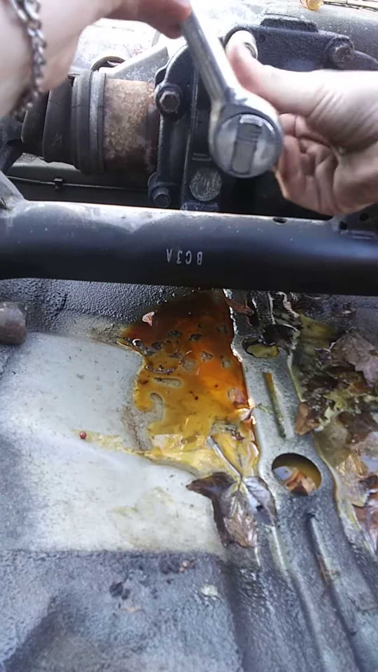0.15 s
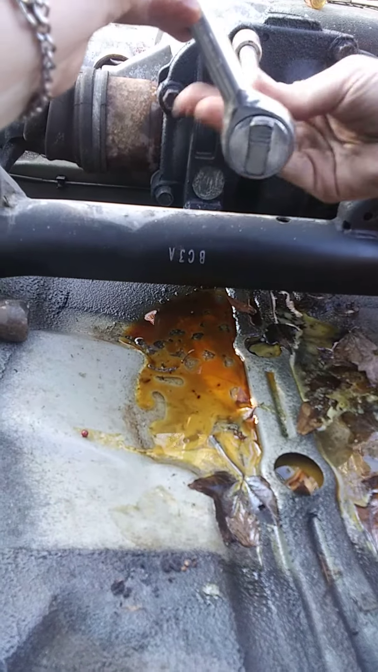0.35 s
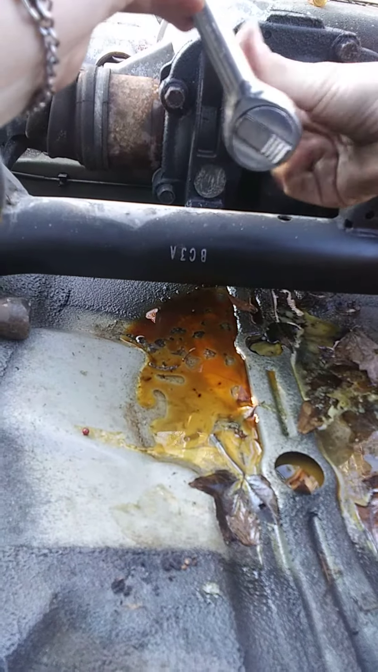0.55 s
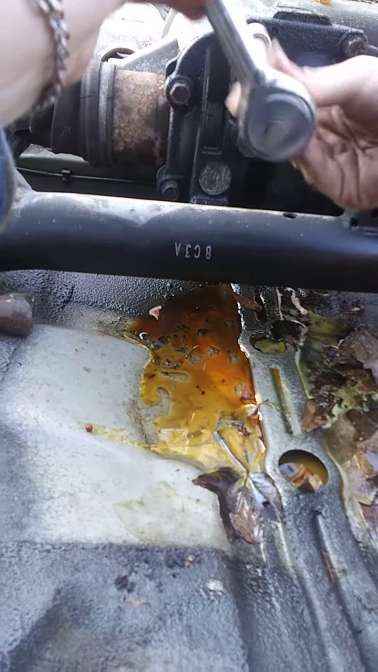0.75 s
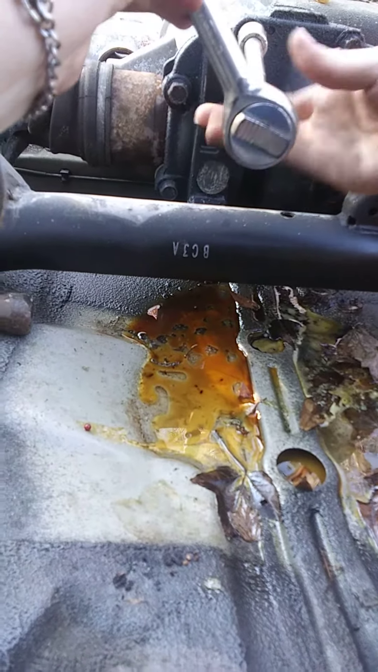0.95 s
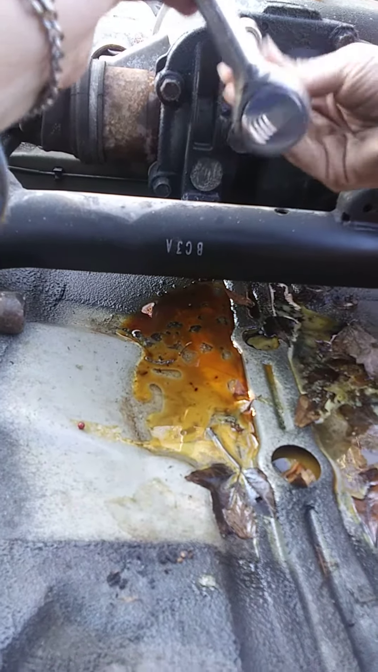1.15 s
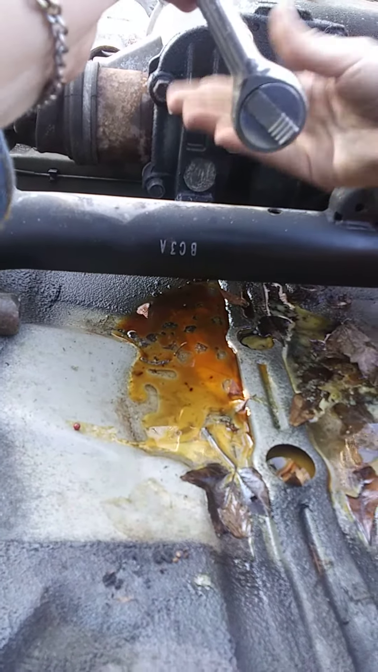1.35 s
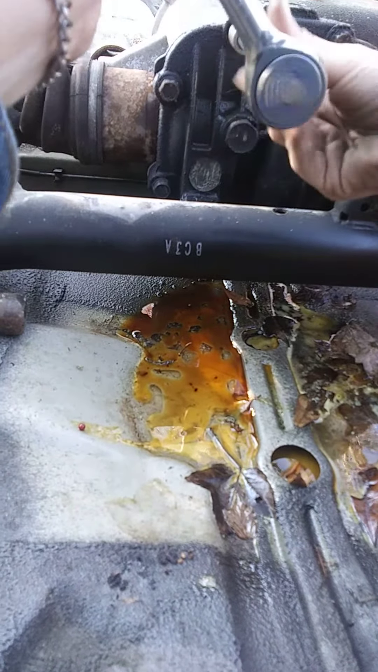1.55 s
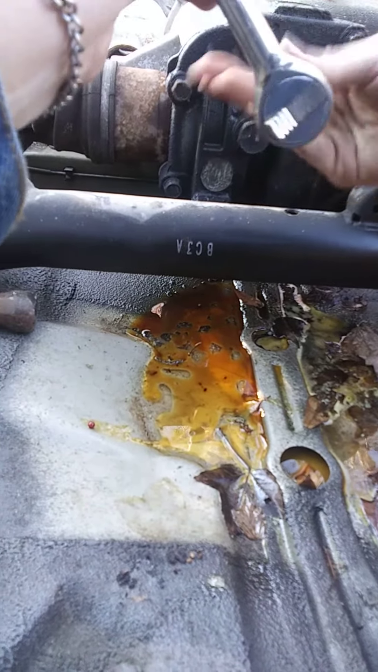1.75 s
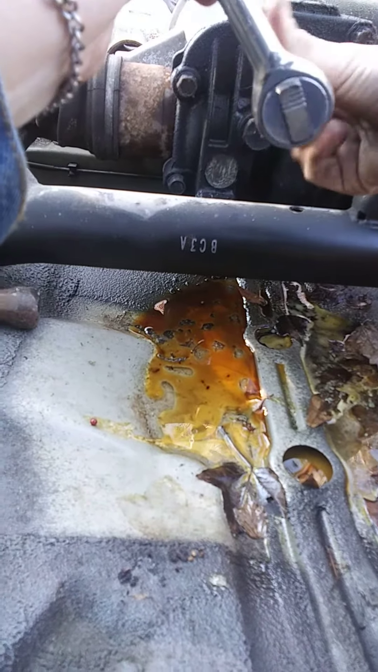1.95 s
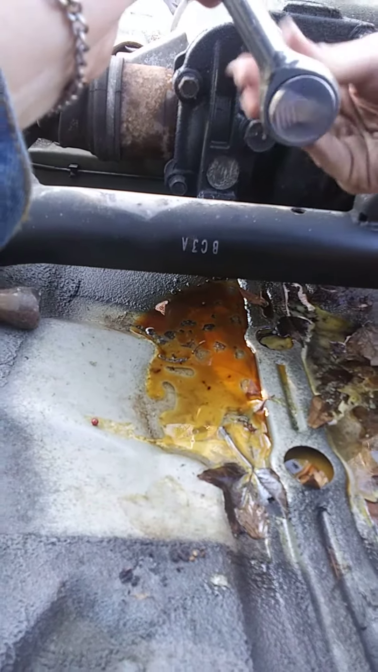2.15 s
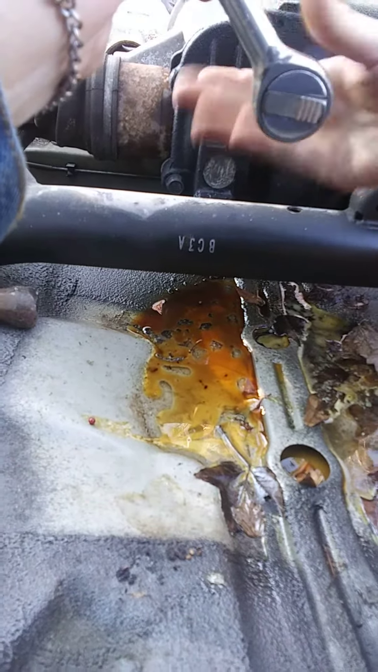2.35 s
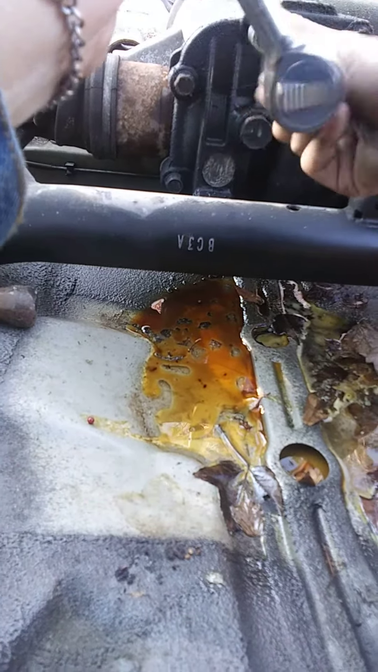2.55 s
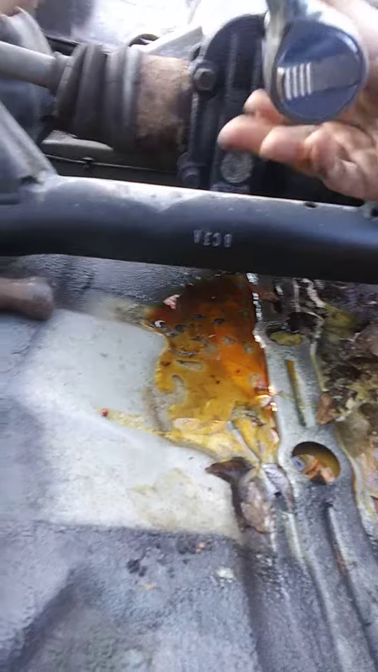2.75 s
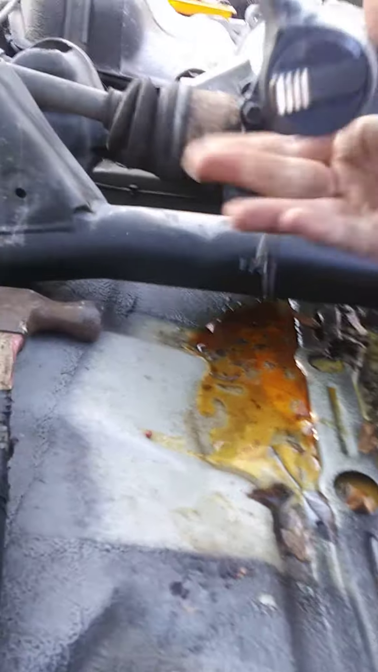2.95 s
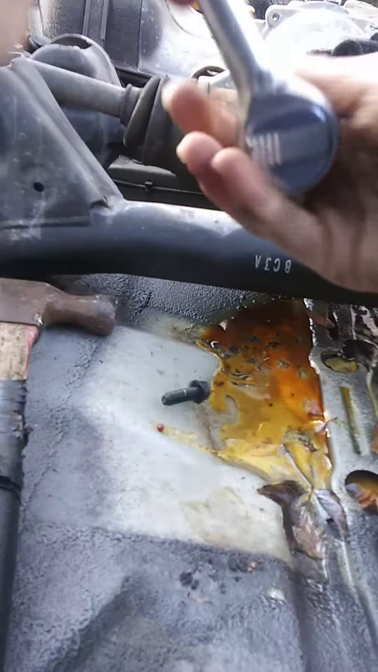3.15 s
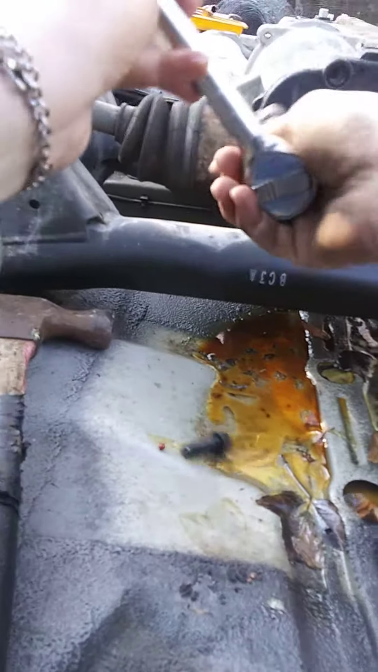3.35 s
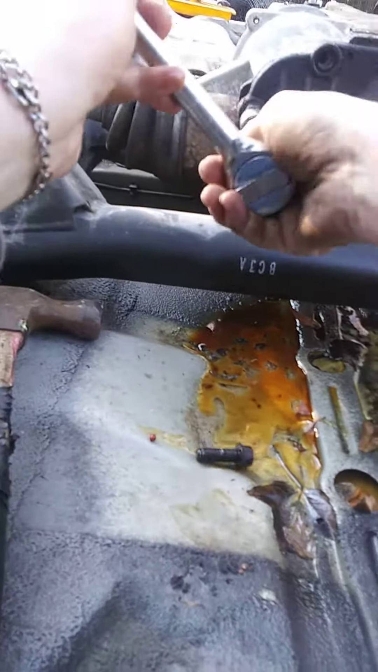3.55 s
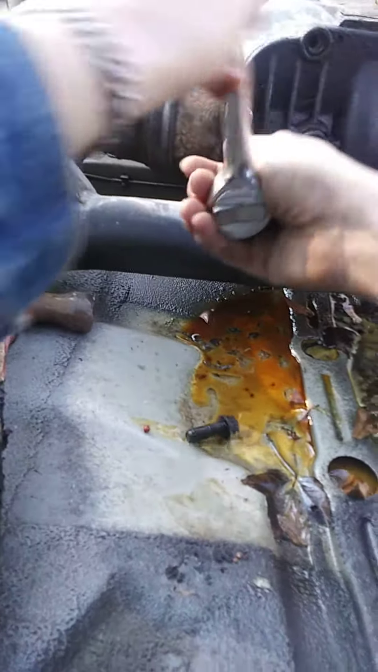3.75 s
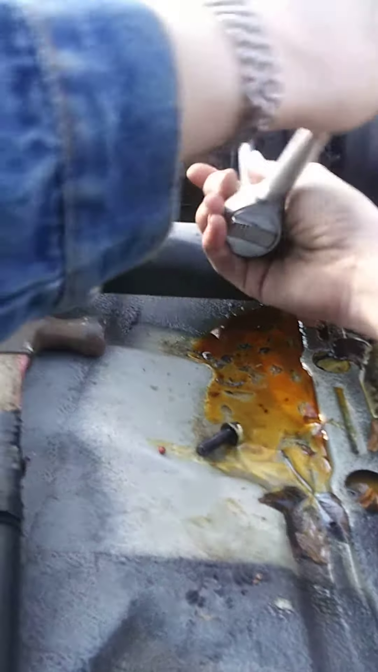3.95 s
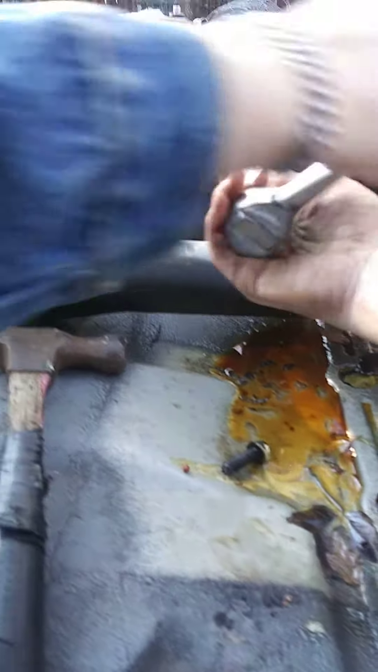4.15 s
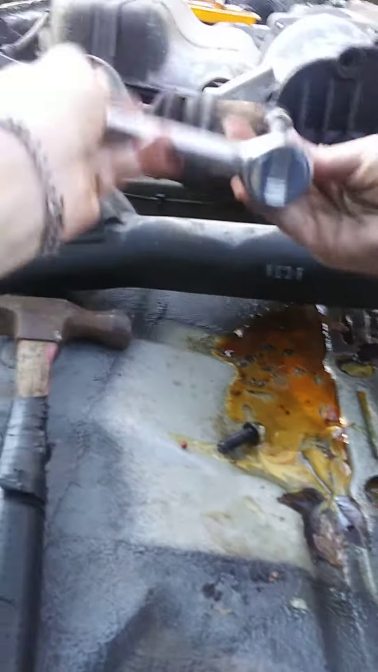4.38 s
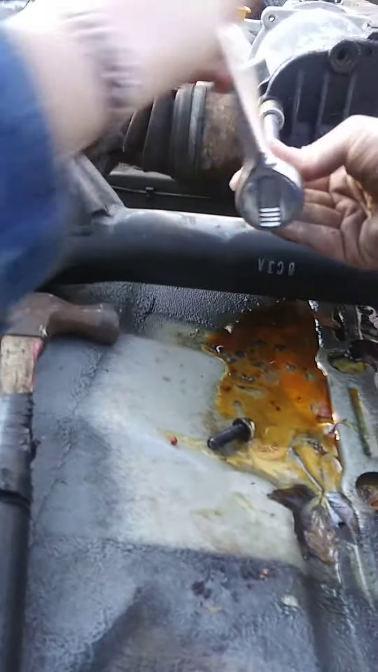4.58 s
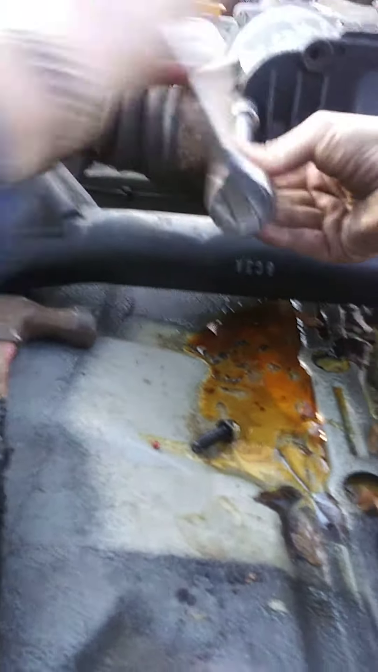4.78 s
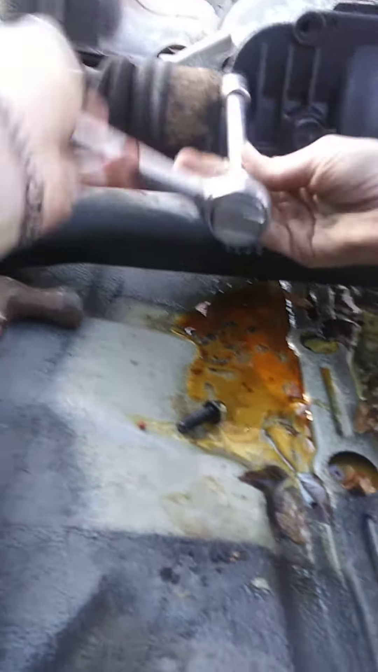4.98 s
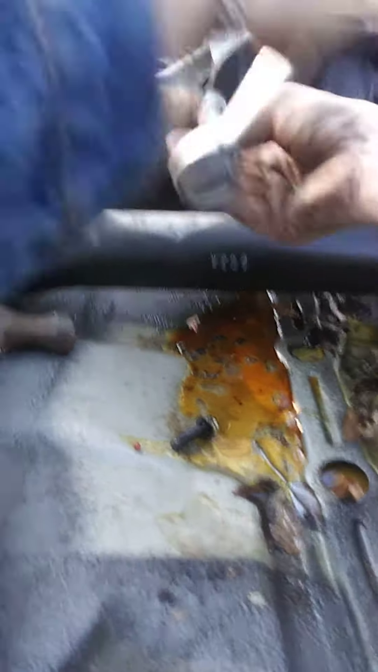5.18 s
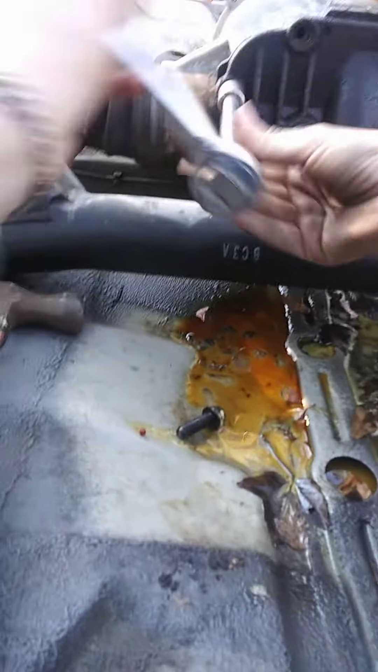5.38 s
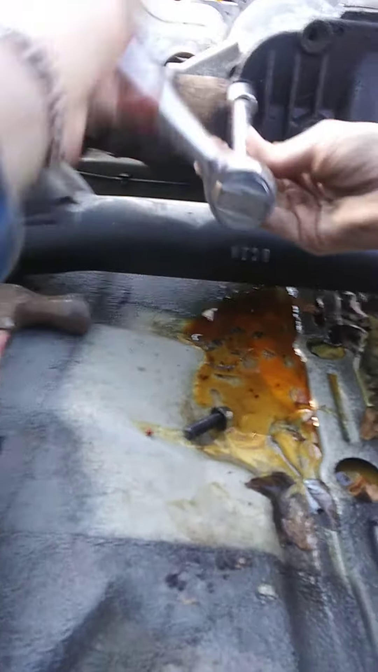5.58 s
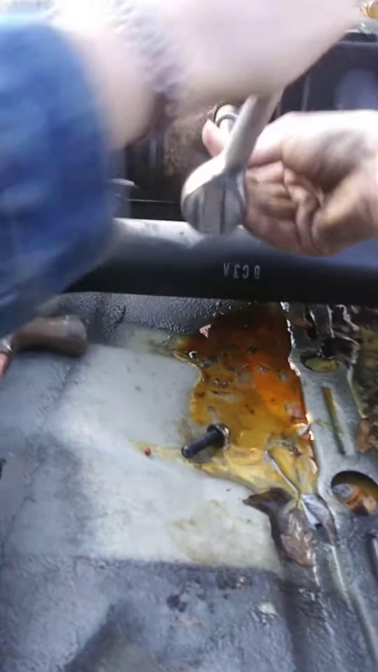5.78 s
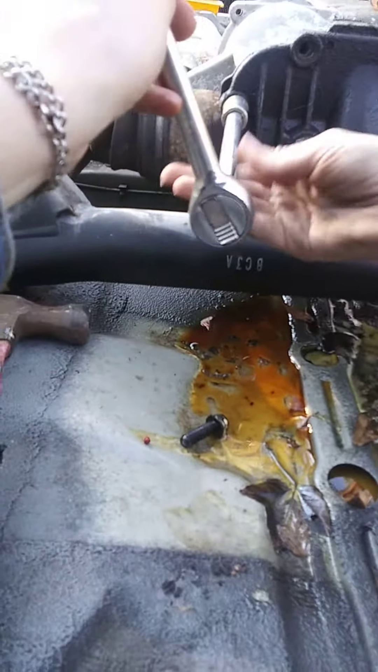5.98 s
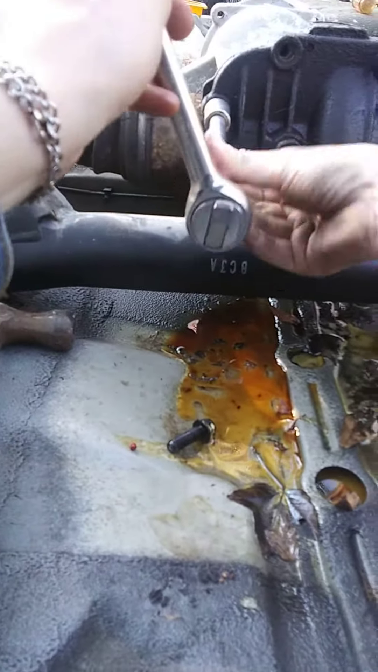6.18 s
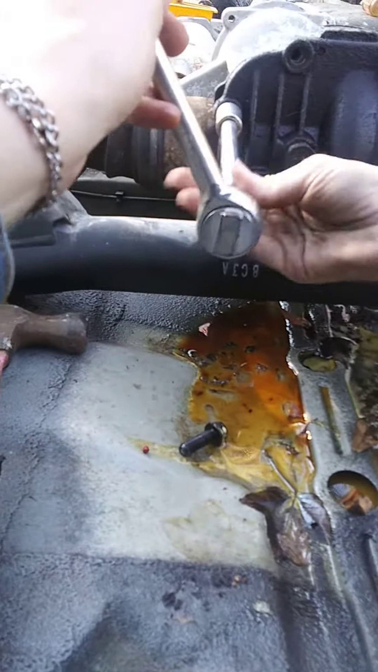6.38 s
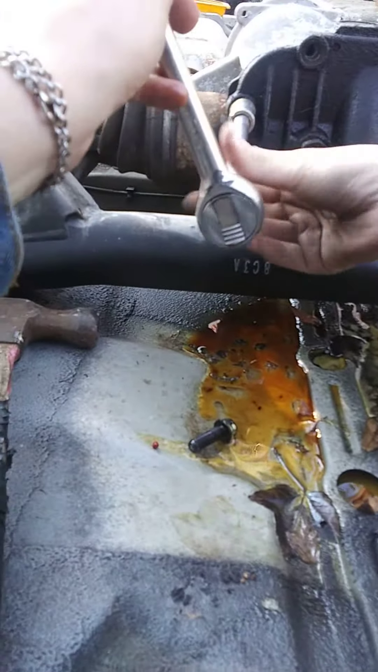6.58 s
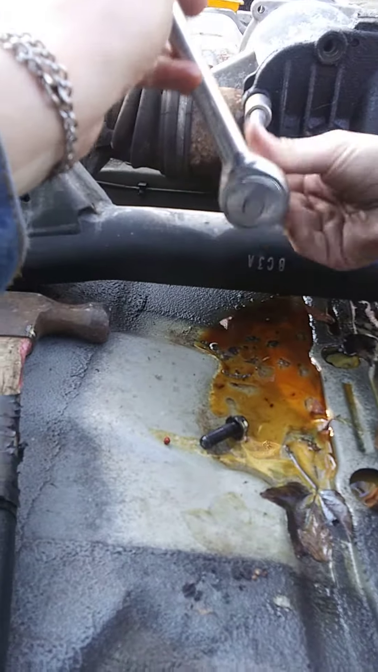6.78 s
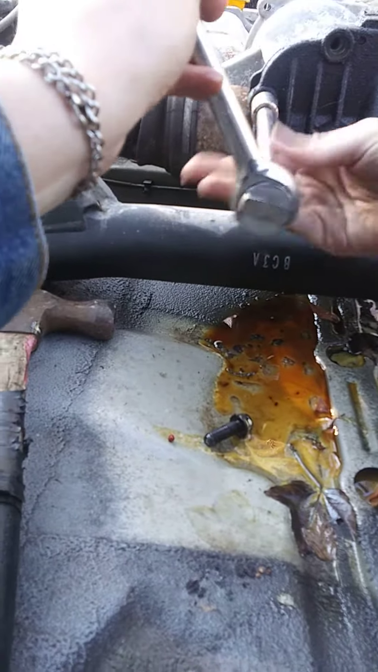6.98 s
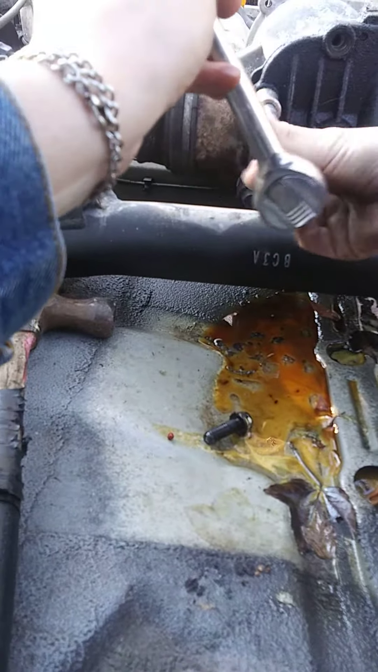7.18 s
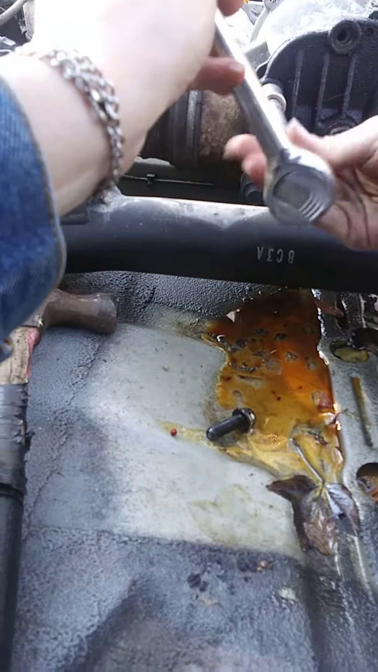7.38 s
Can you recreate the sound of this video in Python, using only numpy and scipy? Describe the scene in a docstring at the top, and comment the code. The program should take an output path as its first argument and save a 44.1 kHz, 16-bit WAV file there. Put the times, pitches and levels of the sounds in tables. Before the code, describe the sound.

Close to the microphone, a hand ratchet swings to and fro, each back stroke a quick, bright zip of metal clicks about three times a second. A freed bolt then clangs loudly on steel, bounces hollowly on plastic and rolls to rest. A sleeve brushes past with soft taps, and the ratcheting returns haltingly, in single teeth and short bursts. Quiet air and a faint hum lie behind, with a dry, short underbody reflection.

```python
"""Under a car, close to the microphone, a hand ratchet is swung to and fro; on each back stroke its pawl
snaps over the gear teeth and rings the steel head. Near 3 s a freed bolt clangs on the frame, bounces on a
plastic drain pan and rolls to rest. Cloth noise marks a sleeve brushing past, strongest at about 4 s, then
the ratchet goes on in slow single teeth and short strokes, among light taps and clinks. Behind it lies
still air with a faint hum that steps up near 6.5 s. A fast limiter holds down the blows."""
import sys
import numpy as np
from scipy import signal
from scipy.fft import rfft, irfft, next_fast_len
from scipy.io import wavfile
from scipy.ndimage import uniform_filter1d, minimum_filter1d, map_coordinates

SR = 44100
rng = np.random.default_rng(int(sys.argv[2]) if len(sys.argv) > 2 else 0)


def wrap_up_sound(samples):
    """Save the sound to the file named by the first command line argument, as 16-bit audio."""
    columns = np.atleast_2d(samples).T
    # keep every value between -1 and 1, then stretch to whole-number steps
    tamed = np.clip(columns, -1, 1)
    steps = np.round(tamed * 32767).astype(np.int16)
    wavfile.write(sys.argv[1], SR, steps)


N = 327663  # length of the scene [samples]


def amp(db):
    """Decibels to gain."""
    return 10 ** (np.asarray(db) / 20)


def unit(x):
    """Scale to rms 1."""
    return x / np.sqrt(np.mean(x ** 2) + 1e-20)


def noise(spectrum, size):
    """Noise of rms 1, coloured by (frequency [Hz], relative level [dB]) points."""
    hz, db = np.transpose(spectrum)
    m = next_fast_len(size)
    bins_hz = np.fft.rfftfreq(m, 1 / SR)
    gain = amp(np.interp(np.log(bins_hz + 1), np.log(hz), db))
    white = rng.standard_normal(m)
    return unit(irfft(rfft(white) * gain, m)[:size])


def wobble(rate):
    """A smooth random curve with `rate` knots a second."""
    knots = rng.standard_normal(int(N * rate / SR) + 4)
    return map_coordinates(knots, [np.arange(N) * rate / SR])


def fade(t, t60):
    """Exponential decay by 60 dB in t60 seconds."""
    return np.exp(-np.log(1000) * t / t60)


def ring(modes, t, scatter_db):
    """Damped modes of a struck body, with new strengths and phases each time."""
    hz, db, t60 = np.transpose(modes)[:, :, None]
    size = amp(db + scatter_db * rng.standard_normal(hz.shape))
    rise = 1 - np.exp(-2 * hz * t)  # each mode builds up mostly within its first cycle
    wave = np.sin(2 * np.pi * (hz * t + rng.random(hz.shape)))
    return np.sum(size * rise * fade(t, t60) * wave, axis=0)


def add(track, s, sound):
    """Mix a sound into the track at time s."""
    part = track[max(round(s * SR), 0):][:len(sound)]
    part += sound[:len(part)]


def swing(u, fastest):
    """Share of its end loss that a stroke has at share u of its length: 1 at both ends, 0 where fastest."""
    side = np.interp(u, [0, np.clip(fastest, .05, .95), 1], [-1, 0, 1])
    return np.abs(side) ** 1.4  # power 1 is a pointed swell, 2 a rounded one


# ring of the ratchet head: (frequency [Hz], relative level [dB], t60 [s])
HEAD_MODES = [(1300, -29, .025), (2750, -9, .018), (3745, -7, .038), (4050, -15, .028), (6970, -12, .05),
              (7350, -15, .025), (8120, -6, .025), (10480, -14, .024), (11060, -26, .025),
              (13000, -24, .035), (14170, -15, .02), (15450, -17, .022)]
# snap of the pawl: (frequency [Hz], relative density [dB per Hz])
SNAP_SPECTRUM = [(40, -30), (200, -7), (900, -23.5), (1900, -12.5), (2800, -3.5), (3900, -5), (4450, -10.5),
                 (5400, -9.5), (6200, 2), (7700, -2.5), (9000, -11.5), (10700, -17.5), (12000, -28.5),
                 (15700, -18)]


def colour(low_db, high_db):
    """A weight in dB for each mode of the head, from weights for its low and high modes."""
    hz = np.transpose(HEAD_MODES)[0]
    return low_db * (hz < 5000) + high_db * (hz > 9000)


def click(t, colour_db, ring_db, snap_t60):
    """The pawl falls on a tooth: a snap, and the ring of the head with its modes weighted by colour_db."""
    modes = [(hz, db + extra, t60) for (hz, db, t60), extra in zip(HEAD_MODES, colour_db)]
    since = t - rng.uniform(0.0012, 0.0055)  # the sprung pawl rebounds once
    rebound = amp(-9.5) * (since > 0) * fade(np.abs(since), snap_t60)
    snap = noise(SNAP_SPECTRUM, len(t)) * (fade(t, snap_t60) + rebound)
    onset = 1 - np.exp(-t / 0.00079)
    return (snap + amp(ring_db) * ring(modes, t, scatter_db=4.5)) * onset


# back strokes; where the wrist hesitates, a stroke comes in two pushes:
# (start [s], length [s], fastest point [share of length], relative vigour there [dB],
#  vigour lost at the ends [dB], weight of the low ring [dB], extra for the lowest modes [dB])
BACK_STROKES = [ (0.105, .104, .62, -28.5, 15, -6, 6.5), (.424, .144, .58, -27.5, 16, -4, 4.5),
                (0.756, .117, 0.44, -34.5, 12, -0.5, 9), (1.19, .078, .5, -28, 8, -4.5, 5),
                (1.525, 0.074, .75, -32.5, 6, -2, 5.5), (1.601, 0.039, .6, -30, 7.5, -6, 11),
                (1.84, .147, .38, -29, 12, 1.5, -3), (2.172, .13, .58, -26, 19, 1, -2.5),
                (2.503, .108, .6, -31.5, 8, 4.5, 2), (5.11, .135, .15, -39, 8.5, -2.5, 1),
                (5.681, .03, .42, -30, 9.5, -4.5, -4), (5.717, .036, .55, -33, 6, 4.5, -18),
                (6.111, .06, .42, -32.5, 7.5, -3.5, -5), (6.459, .04, .1, -32, 2, -0.5, 1.5),
                (6.499, .072, .55, -25.5, 10, -1, -13), (6.781, .06, .68, -29.5, 10, -2, 0),
                (6.845, .05, .55, -26.5, 12, -1.5, 1), (7.107, .066, .55, -26, 8, 1, -15)]
RING_DB, RING_GROWS = -0.5, 0.22  # ring over snap [dB] at vigour -33.5 dB; growth [dB per dB of vigour]
SEAT_DB = 8.5  # spread of the mode weights before smoothing over five teeth [dB]


def back_strokes():
    """The harder the swing, the faster the teeth pass and the louder and brighter the pawl falls."""
    out, t = np.zeros(N), np.arange(SR // 16) / SR
    lowest = np.transpose(HEAD_MODES)[0] < 3000
    for start, length, fastest, peak_db, ends_db, low_ring_db, lowest_db in BACK_STROKES:
        s = start
        # the gear rocks in its seat as it turns, so modes swell and fade over a few teeth
        seating = SEAT_DB * uniform_filter1d(rng.standard_normal((60, len(HEAD_MODES))), size=5, axis=0)
        for seat_db, (force_db, spacing) in zip(seating, rng.standard_normal((60, 2))):
            if s > start + length:
                break
            db = peak_db - ends_db * swing((s - start) / length, fastest)
            teeth_per_s = np.clip(130 * amp(db + 39) ** .7, 95, 380)
            # the power of the swing is shared among the teeth that pass
            size = amp(db + 6.0 + force_db) * np.sqrt(125 / teeth_per_s)
            colour_db = seat_db + lowest_db * lowest + colour(low_ring_db, 0.45 * (db + 33))
            ring_db = RING_DB + RING_GROWS * (db + 33.5)
            add(out, s, size * click(t, colour_db, ring_db, snap_t60=0.015))
            s += np.exp(.07 * spacing) / teeth_per_s
    return out


# the pawl dropping over a lone tooth as the swing turns round:
# (time [s], relative level [dB], weight of the low ring [dB])
LONE_TEETH = [(0.7123, -35, 5), (1.3069, -36.5, 3), (1.8272, -35, 3), (2.6194, -29, 7), (4.5945, -26, -8.5),
              (4.6128, -22, -3.5), (5.0981, -31.5, 7), (5.6082, -32.5, 4), (5.6461, -32.5, 4),
              (5.676, -20.5, -19), (5.8381, -30, -12), (6.103, -31.5, 1), (7.1855, -34, 9)]
# slow turns, where the teeth pass one by one:
# (start [s], length [s], rate [teeth per s], relative level [dB], weight of the low ring [dB])
SLOW_TURNS = [(4.522, .065, 37, -31.5, -4), (4.6381, .1, 45, -32, 6), (5.251, .045, 95, -30.5, -0.5),
              (5.759, .032, 79, -25, -5), (6.1754, .04, 62, -34.5, 5.5), (7.081, .024, 113, -23.5, -6)]


def single_teeth():
    """On slow swings each tooth is heard by itself, with the same snap and ring of the head."""
    out, t = np.zeros(N), np.arange(SR // 12) / SR
    teeth = list(LONE_TEETH)
    for start, length, teeth_per_s, db, low_db in SLOW_TURNS:
        for since in np.arange(0, length, 1 / teeth_per_s):
            teeth.append((start + since, db, low_db))
    for s, db, low_db in teeth:
        tooth = click(t, colour(low_db, high_db=-5.5), ring_db=-2.0, snap_t60=0.01)
        add(out, s, amp(db - 4.0) * tooth)
    return out


# the bolt chattering on the steel frame: (time [s], relative level [dB])
FRAME_HITS = [(2.9062, 9), (2.911, -3), (2.919, 4.5), (2.925, 0.5)]
# ring of bolt and frame: (frequency [Hz], relative level [dB], t60 [s])
STEEL_MODES = [(318, -24, .2), (560, -18, .15), (1460, -14, .1), (1917, -4, .09), (2061, -6, .09),
               (2250, -13, .11), (2450, -11, .08), (3704, -19, .17), (4537, -4, .07), (4642, -4, .16),
               (5905, -12, .1), (6738, -11, .06), (7402, -18, .08), (8643, -4, .125), (9301, -6, .088)]
# noise of each hit: (frequency [Hz], relative density [dB per Hz])
CLASH_SPECTRUM = [(59, -50), (100, -13), (558, -11.5), (836, -33.5), (1060, -13.5), (1720, -14.5),
                  (1910, -2), (4290, -14.5), (4670, -0.5), (5300, -21.5), (5770, -8.5), (9610, -27),
                  (16000, -62)]


def bolt_on_frame():
    """The first hit sets bolt and frame ringing; every hit of the chatter adds a clash of noise."""
    out, t = np.zeros(N), np.arange(SR // 3) / SR
    add(out, FRAME_HITS[0][0], amp(2) * ring(STEEL_MODES, t, scatter_db=1.7))
    for s, db in FRAME_HITS:
        clash = noise(CLASH_SPECTRUM, len(t)) * fade(t, .06)
        add(out, s, amp(db - 6) * clash)
    return out


# the bolt bouncing on the pan: (time [s], relative level [dB], relative thump [dB], relative crack [dB],
#  pitch that the struck spot favours [Hz])
PAN_BOUNCES = [(3.0982, 5.5, -2, 5, 396.8), (3.192, -4, 4.5, -11.5, 541), (3.2026, 4, -2, 1.5, 1008),
               (3.2713, -2.5, 3, -2.5, 743), (3.2987, -3.5, 3.5, 4, 1829), (3.3285, -18, 7.5, -3, 1600),
               (3.4149, -26.5, 0.5, -11.5, 1190), (3.4907, -24.5, 4, -26.5, 440)]
# modes of the plastic pan: (frequency [Hz], relative level [dB], t60 when bounced on [s])
PAN_MODES = [(130, -19, .3), (200, -18, .25), (265, -15, .2), (305, -15, .2), (352, -11, .26),
             (440, -8, .25), (490, -7, .11), (578, -6.5, .13), (672, -4, .075), (790, -16, .05),
             (1071, -11, .09), (1200, -7, .07), (1470, -9, .07), (1720, -8, .075), (2050, -12, .05),
             (2580, -11, .055)]
# crack of the plastic: (frequency [Hz], relative density [dB per Hz])
CRACK_SPECTRUM = [(50, -47.5), (150, -1.5), (550, -3), (850, -13), (1600, -1), (2200, -7), (2700, -3),
                  (4100, -8.5), (4600, -24), (5400, -22.5), (6100, -12), (7600, -17.5), (11800, -42.5),
                  (15700, -40)]


def bolt_on_pan():
    """Each bounce cracks on the plastic and drums the pan in the modes that the struck spot favours."""
    out, t = np.zeros(N), np.arange(SR // 2) / SR
    for s, db, thump_db, crack_db, spot_hz in PAN_BOUNCES:
        crack = noise(CRACK_SPECTRUM, len(t)) * (fade(t, 0.019) + amp(-27.5) * fade(t, 0.053))
        # a mode loses 5 dB for each octave from the favoured pitch
        modes = [(hz, level - 5 * abs(np.log2(hz / spot_hz)), t60) for hz, level, t60 in PAN_MODES]
        dent = 1 + 2.1 * fade(t, 0.024)  # strongest while the dent springs back
        drum = ring(modes, t, scatter_db=1.3) * dent
        add(out, s, amp(db + crack_db - 2.5) * crack + amp(db + thump_db - 7.5) * drum)
    return out


# scrape and scratch of a rubbed surface: (frequency [Hz], relative density [dB per Hz])
SCRATCH_SPECTRUM = [(500, -20.5), (1050, 6.5), (2000, 1), (3600, -4), (4800, -22.5), (6500, -14),
                    (8200, -23), (10000, -36.5), (15000, -37.5)]
ROLL_START_S, ROLL_LENGTH_S, ROLL_EDGE_S = 3.325, .245, 0.018
ROLL_DB, ROLL_SLOWING_DB_PER_S = -34.5, 32  # level at the start, and its fall


def bolt_rolling():
    """The corners of the bolt's head patter over the pan with a faint scrape, softer until it stops."""
    since, t = np.arange(N) / SR - ROLL_START_S, np.arange(SR // 3) / SR
    rolling = np.clip(np.minimum(since, ROLL_LENGTH_S - since) / ROLL_EDGE_S, 0, 1)
    level = rolling * amp(ROLL_DB - ROLL_SLOWING_DB_PER_S * np.clip(since, 0, ROLL_LENGTH_S))
    contacts = (rng.random(N) < 220 / SR) * rng.standard_normal(N)  # about 220 a second
    answer = ring(PAN_MODES, t, scatter_db=1) * fade(t, .15)
    patter = unit(signal.fftconvolve(contacts, answer)[:N])
    scrape = amp(-21.5 + 3 * wobble(150) + 2.5 * wobble(60)) * noise(SCRATCH_SPECTRUM, N)
    return level * (patter + scrape)


# small knocks of hand, socket and tool: (time [s], relative level [dB], relative dull knock [dB])
TAPS = [(0.284, -50, -13), (1.718, -62, 25), (2.058, -65, 18.5), (2.4393, -32.5, -14), (2.6471, -37, -22),
        (3.3955, -35, -1), (3.5439, -42, 6), (3.6586, -57.5, 23), (3.8031, -32.5, -5.5),
        (3.8379, -26.5, -8.5), (3.896, -36, 8), (4.121, -35.5, 0), (4.8214, -39.5, -21), (5.2973, -43, 14)]
# a light contact on metal: (frequency [Hz], relative density [dB per Hz])
TICK_SPECTRUM = [(800, -13), (1600, -3), (3200, 6.5), (4700, -14.5), (6500, -1), (8300, -11), (11000, -23),
                 (15700, -26.5)]
# its dull part: (frequency [Hz], relative density [dB per Hz])
KNOCK_SPECTRUM = [(60, -11.5), (250, 5.5), (1200, -1.5), (2600, -15.5), (5000, -36.5)]


def taps():
    """Light contacts: a bright tick over a dull knock, both decaying noise."""
    out, t = np.zeros(N), np.arange(SR // 12) / SR
    for s, db, knock_db in TAPS:
        tick = noise(TICK_SPECTRUM, len(t)) * fade(t, 0.023)
        knock = noise(KNOCK_SPECTRUM, len(t)) * fade(t, 0.047)
        add(out, s, amp(db - 2.5) * (tick + amp(knock_db - 3.5) * knock))
    return out


# the socket clinking on its bar: (time [s], relative level [dB])
CLINKS = [(2.437, -37.5), (6.72, -53.5), (6.948, -51)]
# ring of the socket: (frequency [Hz], relative level [dB], t60 [s])
SOCKET_MODES = [(4000, -2, 0.05), (7030, -15, 0.043)]


def clinks():
    """The loose socket rings briefly in its few modes."""
    out, t = np.zeros(N), np.arange(SR // 10) / SR
    for s, db in CLINKS:
        add(out, s, amp(db) * ring(SOCKET_MODES, t, scatter_db=7.5))
    return out


# steady rubbing of the hands, strongest while the arm is near the microphone: (time [s], relative level [dB])
RUB_LEVEL = [(0, -62), (2.55, -63.5), (2.88, -45.5), (3.06, -48), (3.35, -39), (3.55, -45), (3.62, -60.5),
             (5.55, -52), (6.5, -61), (7.43, -60)]
# brushes of the sleeve: (middle [s], length [s], relative level [dB])
SLEEVE_BRUSHES = [(1.475, .2, -54.5), (2.067, 0.034, -53.5), (2.546, 0.115, -52.5), (3.732, 0.2, -46),
                  (3.849, 0.18, -40), (4.062, 0.31, -39), (4.37, 0.39, -48), (4.897, 0.11, -51.5),
                  (5.24, 0.5, -50.5), (6.17, 0.283, -53)]
# soft rub of cloth: (frequency [Hz], relative density [dB per Hz])
CLOTH_SPECTRUM = [(20, -45.5), (60, -6), (130, -1), (250, -0.5), (540, -5.5), (780, -12.5), (1200, -16.5),
                  (1600, -25.5), (3000, -53.5)]


def rubbing():
    """Cloth and skin catch and slip, which gives the rub a fine grain; each brush swells and fades."""
    now = np.arange(N) / SR
    power = amp(np.interp(now, *np.transpose(RUB_LEVEL))) ** 2
    for middle, length, db in SLEEVE_BRUSHES:
        swell = np.cos(np.pi * np.clip((now - middle) / length, -.5, .5))
        power = power + (amp(db) * swell) ** 2
    slips = amp(1.2 * wobble(35) + 1.8 * wobble(170))
    rub = amp(2) * noise(CLOTH_SPECTRUM, N)
    scratch = amp(-7.5) * noise(SCRATCH_SPECTRUM, N)
    return np.sqrt(power) * slips * (rub + scratch)


def underbody(x):
    """Short, dull reflections between the floor and the underside of the car."""
    t = np.arange(SR // 3) / SR
    spectrum = [(100, 4.5), (1500, 8), (4000, -14.5), (12000, -19.0)]
    tail = noise(spectrum, len(t)) * fade(t, 0.064) * (t > .003)
    return signal.fftconvolve(x, tail / np.linalg.norm(tail))[:N]


# still background: (frequency [Hz], relative density [dB per Hz])
AIR_SPECTRUM = [(20, -46), (45, -15.5), (100, -3.5), (140, -10), (200, -15.5), (280, -5.5), (450, -13.5),
                (1040, -19), (1600, -31.5), (5000, -39.5), (9000, -36), (15700, -39)]
# tones of the faint hum: (frequency [Hz], relative level [dB])
HUM_TONES = [(129.2, -62.5), (263.8, -64.5)]
HUM_QUIET_DB, HUM_LOUD_DB, HUM_RISE_S = -7, 1, (6.4, 6.7)  # the hum steps up near the end


def background():
    """Still air as steady noise, with a faint hum of sines whose phase wavers."""
    now = np.arange(N) / SR
    hum = np.zeros(N)
    for hz, db in HUM_TONES:
        hum += amp(db) * np.sqrt(2) * np.sin(2 * np.pi * hz * now + .5 * wobble(15))
    hum_level = amp(np.interp(now, HUM_RISE_S, [HUM_QUIET_DB, HUM_LOUD_DB]))
    return amp(-61.0) * noise(AIR_SPECTRUM, N) + hum_level * hum


def scene():
    """Tool, bolt and hands in the gap under the car."""
    bolt = bolt_on_frame() + bolt_on_pan() + bolt_rolling()
    # frame and pan are too small to radiate much below 120 Hz
    bolt = signal.sosfilt(signal.butter(3, 120, "highpass", fs=SR, output="sos"), bolt)
    metal = back_strokes() + single_teeth() + taps() + clinks() + bolt
    return (metal + amp(-20.5) * underbody(metal) + rubbing() + background())[None]


def record(dry):
    """The microphone's bass roll-off, a fast limiter, then the recorder's band limit."""
    dry = signal.sosfilt(signal.butter(2, 65, "highpass", fs=SR, output="sos"), dry)
    ceiling, top_hz = .92, 15850
    needed = np.minimum(1, ceiling / (np.abs(dry) + 1e-9))
    # hold the lowest gain around each peak, then smooth it [samples]
    gain = uniform_filter1d(minimum_filter1d(needed, size=121), size=61)
    m = next_fast_len(N + SR // 4)
    passed = np.fft.rfftfreq(m, 1 / SR) < top_hz
    return irfft(rfft(dry * gain, m) * passed, m)[..., :N]


dry = scene()
out = record(dry)
wrap_up_sound(out)
```